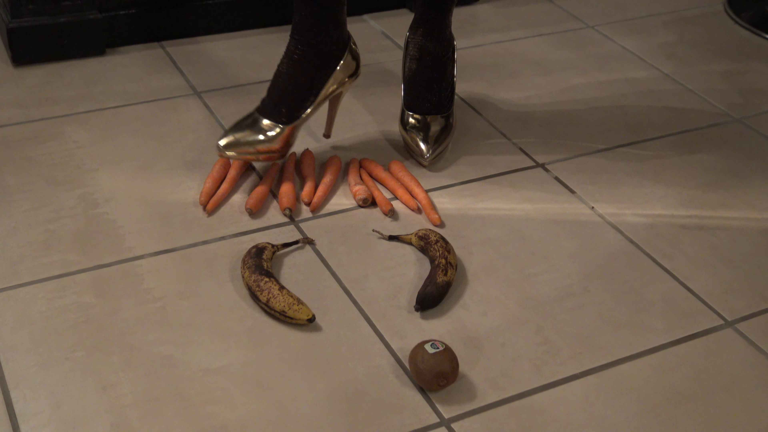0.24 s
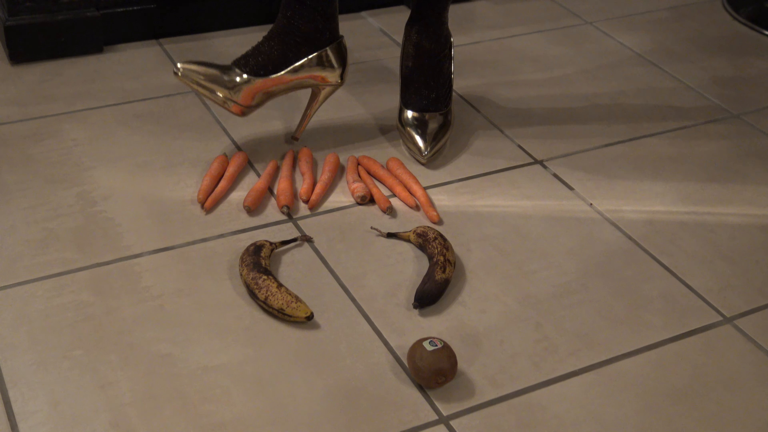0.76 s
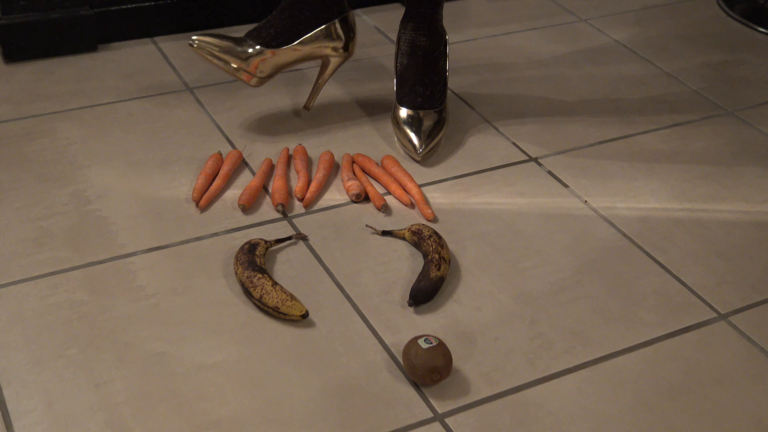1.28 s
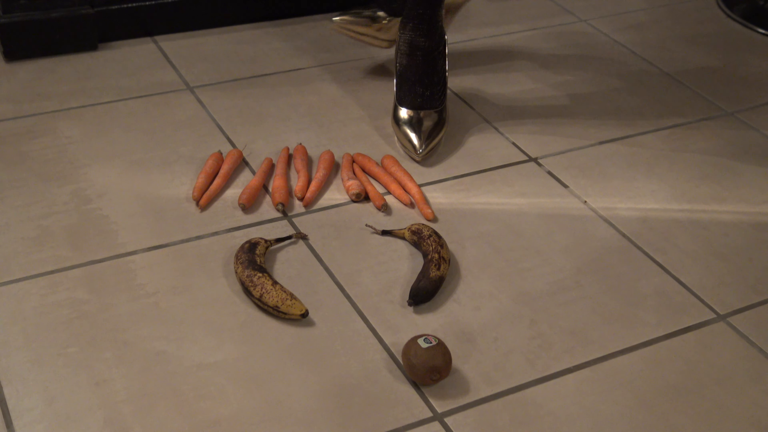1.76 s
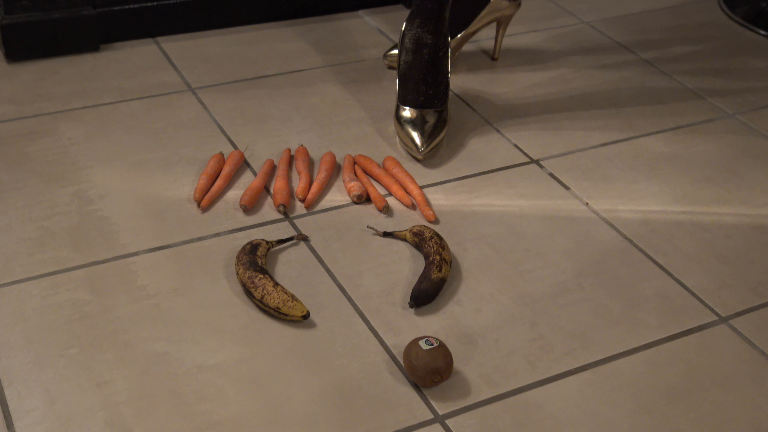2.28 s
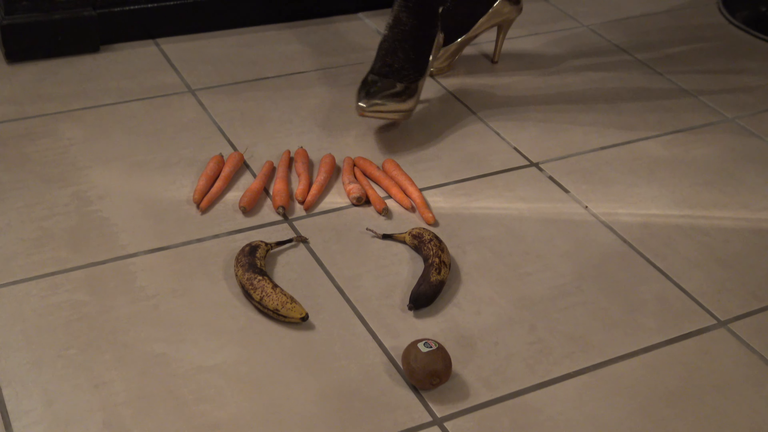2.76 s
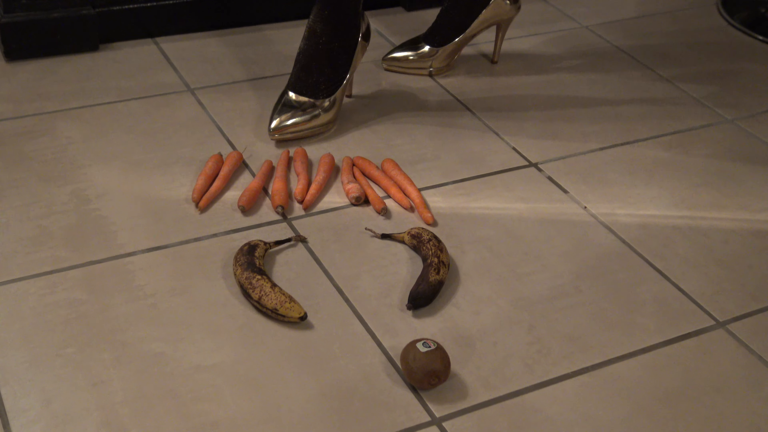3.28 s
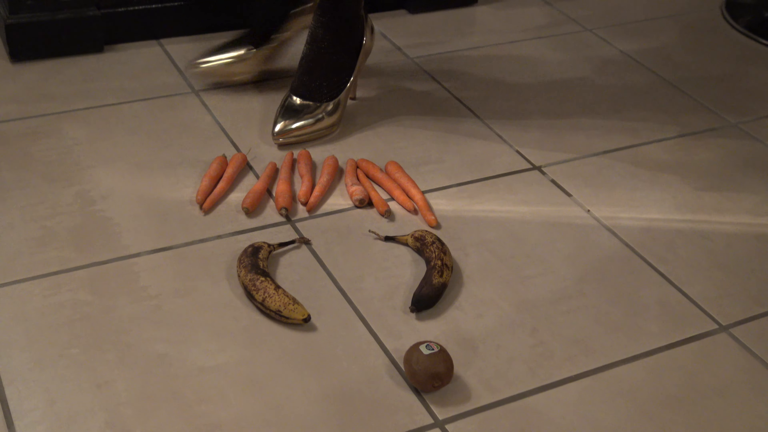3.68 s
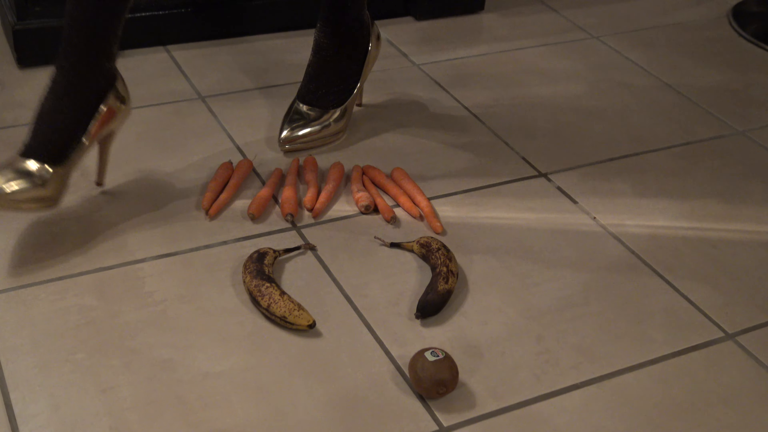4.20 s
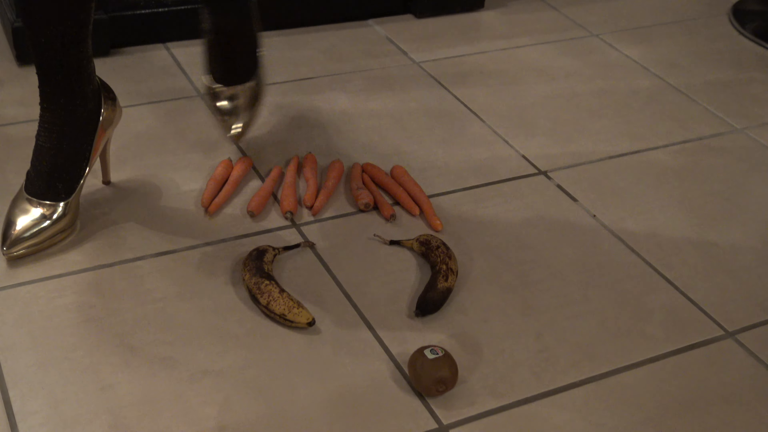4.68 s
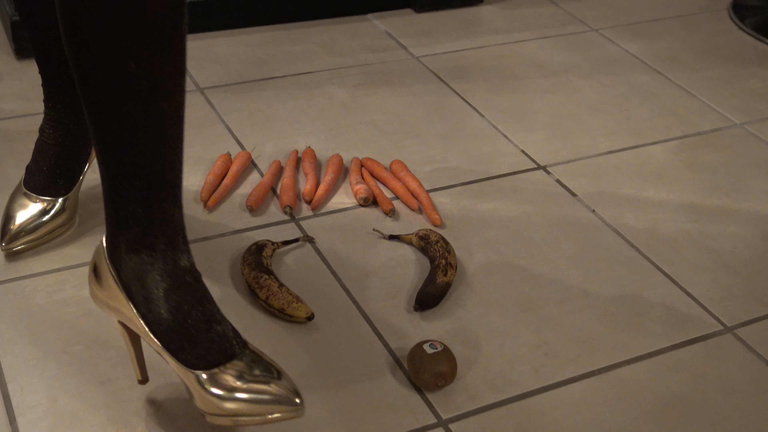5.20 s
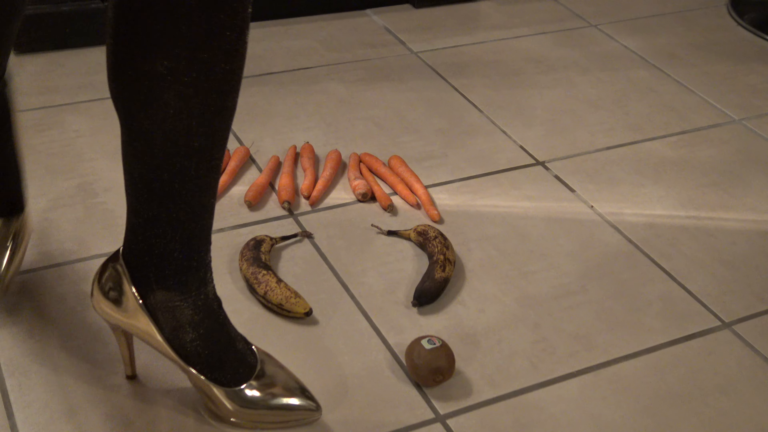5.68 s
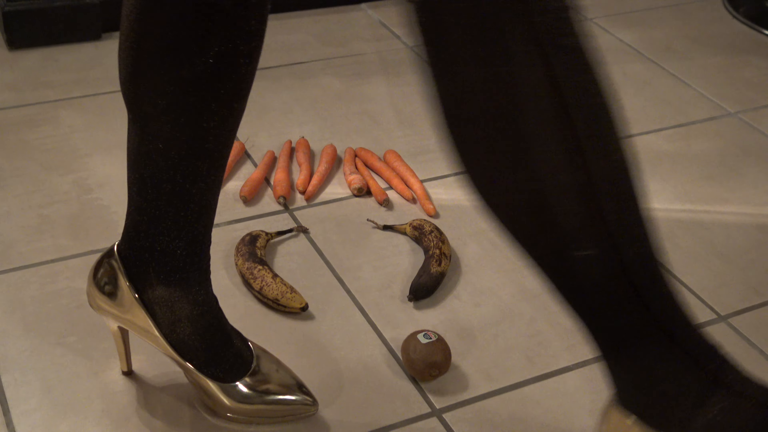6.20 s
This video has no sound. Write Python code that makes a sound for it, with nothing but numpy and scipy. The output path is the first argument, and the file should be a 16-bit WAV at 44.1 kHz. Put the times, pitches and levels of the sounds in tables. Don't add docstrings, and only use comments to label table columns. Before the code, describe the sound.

High heels step slowly across hard kitchen tile, five sharp knocks about a second apart, with stocking hiss and a faint refrigerator hum.

```python
import sys
import numpy as np
from scipy import signal
from scipy.fft import rfft, irfft, next_fast_len
from scipy.io import wavfile
from scipy.ndimage import map_coordinates

SR = 44100
rng = np.random.default_rng(int(sys.argv[2]) if len(sys.argv) > 2 else 0)


def attenuation_scalar(level_db):
    decades = np.asarray(level_db, float) / 20
    return 10 ** decades


def file_out(sig):
    cols = np.atleast_2d(sig).T
    lim = np.clip(cols, -1, 1)
    pcm = np.round(lim * 32767).astype(np.int16)
    wavfile.write(sys.argv[1], SR, pcm)


N = 284445
SPAN = 1 << 15
LEFT_RIGHT = np.array([[1], [-1]])


def unit(x):
    return x / np.sqrt(np.mean(x ** 2) + 1e-20)


def along(points, hz):
    f, v = np.transpose(points)
    return np.interp(np.log(hz + 1), np.log(f + 1), v)


def wobble(rate):
    knots = rng.standard_normal(int(N * rate / SR) + 4)
    return map_coordinates(knots, [np.arange(N) * rate / SR])


def spread(pair, gain, alike):
    hz = np.fft.rfftfreq(pair.shape[1], 1 / SR)
    turn = np.arccos(np.clip(along(alike, hz), -1, 1)) / 2
    mid, side = irfft(rfft(pair) * gain(hz) * [np.cos(turn), np.sin(turn)], pair.shape[1])
    return np.array([mid + side, mid - side])


def rush(gain, alike):
    noise = rng.standard_normal((2, next_fast_len(N)))
    return unit(spread(noise, gain, alike)[:, :N])


def resonance(hz, centre, sharp):
    swing = 1j * hz * centre / sharp
    return swing / (centre ** 2 - hz ** 2 + swing)


def swells(rows, rest_db):
    t = np.arange(N) / SR
    power = attenuation_scalar(2 * rest_db)
    for s, db, rise, fall in rows:
        width = np.where(t < s, rise, fall)
        power = power + attenuation_scalar(2 * (db - 6 * ((t - s) / width) ** 2))
    return np.sqrt(power)


# frequency in Hz, level in dB per Hz.
AIR_COLOUR = [(12, -50), (25, -19), (48, -15.5), (80, -15), (125, -11.5), (170, -9.5), (320, -9.5),
              (434, -15.5), (680, -14), (1050, -16.5), (1440, -25), (2820, -30.5), (12800, -36),
              (15800, -42)]
# frequency in Hz, left-right likeness from 0 to 1.
AIR_LIKENESS = [(25, 0.91), (60, 0.71), (130, 0.94), (290, 0.95), (640, 0.92), (1410, 0.89), (3100, 0.93),
                (6820, 0.64), (15000, .8)]
# frequency in Hz, left over right in dB.
AIR_BALANCE = [(60, -0.5), (110, -0.5), (200, 1.0), (380, 3.0), (700, 3.5), (1290, -1.0), (2380, 1.0),
               (4400, 0.0), (8120, 0.0), (15000, -0.5)]
# frequency in Hz, width in Hz, level in dB over the air.
CASE_WHIRR = [(172, 14, 6), (200, 8, 6), (258, 10, 5), (301, 10, 7), (348, 10, 7), (685, 20, 5),
              (990, 40, 6), (2799, 9, 15)]


def kitchen():
    def colour(hz):
        whirr = 1
        for centre, width, db in CASE_WHIRR:
            whirr = whirr + (attenuation_scalar(db) - 1) / (1 + (2 * (hz - centre) / width) ** 2)
        return attenuation_scalar(along(AIR_COLOUR, hz)) * whirr

    air = rush(colour, AIR_LIKENESS)
    lean = attenuation_scalar(along(AIR_BALANCE, np.fft.rfftfreq(N, 1 / SR)) / 2 * LEFT_RIGHT)
    air = irfft(rfft(air) * lean, N)
    hum_hz, hum_db, air_db = 99.4, -54.5, -53
    hum = np.sqrt(2) * np.sin(2 * np.pi * hum_hz * np.arange(N) / SR + 0.12 * wobble(5.7))
    hum = attenuation_scalar(hum_db + 0.6 * wobble(5)) * hum
    return attenuation_scalar(air_db + 1.23 * wobble(2.49)) * air + hum


# frequency in Hz, time to die by 60 dB in seconds.
WALL_DECAY = [(100, 0.28), (250, 0.34), (600, 0.33), (1500, 0.28), (4000, 0.27), (12000, 0.32)]
# frequency in Hz, level in dB.
WALL_TONE = [(100, 2.5), (250, 0), (600, -2), (1500, 7), (4000, 4), (12000, 3)]
# frequency in Hz, left-right likeness from 0 to 1.
WALL_LIKENESS = [(200, 1), (1500, 0.98), (3000, 0.99), (7000, 0.93), (15000, .93)]


def walls(gap=.001, ceiling=.008, before_db=-5, lumps_db=1.6):
    half = SPAN // 2
    hz, t, z = signal.stft(rng.standard_normal((2, half)), SR, nperseg=256)
    fade = attenuation_scalar(-60 * t / along(WALL_DECAY, hz)[:, None])
    tail = signal.istft(z * fade, SR, nperseg=256)[1][:, :half]
    tail = np.pad(tail, ((0, 0), (0, half)))
    tail = spread(tail, lambda f: attenuation_scalar(along(WALL_TONE, f)), WALL_LIKENESS)
    age = np.arange(SPAN) / SR
    echoes = map_coordinates(rng.standard_normal(200), [age * 220])
    onset = np.where(age < ceiling, attenuation_scalar(before_db), 1) * (age > gap) * attenuation_scalar(lumps_db * echoes)
    onset[half:] = 0
    return tail * onset / np.linalg.norm(tail[0] * onset)


def peak(spectrum):
    return spectrum / np.abs(irfft(spectrum)).max()


# time in seconds, left over right in dB.
WALKER_PLACE = [(0, 1.5), (2.1, 2), (3.2, 2.5), (4.3, 2.5), (5.3, 3), (6.3, 2), (6.45, -0.5)]


def contacts(rows, tip, sharp, bass, skid, room_db):
    out, hz = np.zeros((2, N + SPAN)), np.fft.rfftfreq(SPAN, 1 / SR)
    tick = 0
    for k, (mode_hz, mode_sharp, db) in enumerate(tip):
        tick = tick + (-1) ** k * attenuation_scalar(db) * resonance(hz, mode_hz, mode_sharp)
    tick = peak(tick)
    late = np.exp(-2j * np.pi * hz * 0.00063)
    place_s, place_db = np.transpose(WALKER_PLACE)
    for s, db, knock_hz, tick_db, wet_db in rows:
        soft = resonance(hz, knock_hz, sharp) * resonance(hz, knock_hz, 0.35) / (1j * hz + 1) ** 2
        small = (resonance(hz, bass * knock_hz, 0.91) * 1j * hz) ** 2
        lean = attenuation_scalar(np.interp(s, place_s, place_db) / 2 * LEFT_RIGHT)
        knock = -lean * peak(soft * small) * late
        slips = rng.standard_normal(SPAN) * attenuation_scalar(-60 * np.arange(SPAN) / SR / skid)
        slips = slips / np.linalg.norm(slips)
        direct = knock + attenuation_scalar(tick_db) * tick * rfft(slips)
        answer = (knock + attenuation_scalar(tick_db) * tick) * attenuation_scalar(room_db + wet_db) * rfft(walls())
        at = round(s * SR)
        out[:, at:at + SPAN] += attenuation_scalar(db) * irfft(direct + answer)
    return out[:, :N]


# start in seconds, knock peak in dB, knock pitch in Hz, tick in dB over the knock,
# room answer in dB.
SCUFF_HITS = [(.559, -50, 910, 1.5, 9), (.59, -56.5, 1500, 9, 4), (1.378, -56, 1500, 13, 5),
              (2.068, -28, 720, -16, 9.5), (2.3745, -40.5, 730, 7, -0.5), (2.378, -40.5, 2400, 10.5, -11),
              (2.381, -36.5, 654, -1, -8), (2.4192, -39.5, 790, 17, -9), (2.422, -36, 2420, -3, -11),
              (2.427, -37, 780, -3, -0.5), (2.45, -44, 780, -10, 6.5), (2.49, -41.5, 475, 0, 2.5),
              (2.56, -51.5, 920, 0.5, 10.5), (3.393, -33.5, 2600, -6, -10), (3.93, -47.5, 1200, 7, 1),
              (4.262, -42, 497, -7, 17), (5.319, -37.5, 607, -29, 22.5), (6.382, -33, 644, -6, 3)]
# frequency in Hz, sharpness (Q), level in dB.
LIGHT_TIP = [(1500, 1.1, -1.5), (2600, 1.62, 6), (4870, 0.94, 0.5), (9600, 0.97, -5.5)]


def scuffs():
    return contacts(SCUFF_HITS, LIGHT_TIP, sharp=2.2, bass=.58, skid=.0004, room_db=6)


# frequency in Hz, level in dB per Hz.
FIBRE_COLOUR = [(760, -36), (1300, -6.5), (2150, -2), (2710, -2), (4580, 0), (6090, 1), (8260, 2.5),
                (13500, -3.5), (16000, -7.5)]
# peak time in seconds, peak in dB, rise in seconds, fall in seconds,
# dullness in dB.
LEG_BRUSHES = [(.63, -67.5, 0.024, .05, 7), (.72, -65, .02, 0.025, 4), (.92, -64.5, 0.14, 0.16, 3),
               (1.79, -65.5, 0.067, 0.048, -14), (2.10, -47, 0.029, 0.07, 1), (2.2, -60, 0.046, 0.092, 8),
               (2.44, -55, 0.096, 0.11, -2), (2.68, -65.5, .08, .08, 4), (2.84, -52, 0.066, 0.081, 0),
               (3.02, -54, 0.11, 0.068, 0.5), (3.30, -61, .03, 0.052, 3), (3.49, -46.5, 0.068, 0.092, 2.5),
               (3.73, -57.5, 0.17, .07, 3), (4.05, -55.5, 0.11, 0.11, -1.5),
               (4.44, -51.5, 0.041, 0.055, -2), (4.66, -55, 0.16, 0.14, 3.5),
               (4.87, -56.5, 0.057, 0.092, -0.5), (5.02, -64, .06, 0.068, 5.5),
               (5.19, -62.5, 0.12, 0.24, 0), (5.42, -60, 0.1, 0.11, 7.5), (5.6, -53, 0.086, 0.079, 4),
               (5.73, -44, 0.076, 0.053, -1.5), (5.92, -55, 0.11, 0.077, 1.5),
               (6.15, -52.5, 0.074, 0.13, 2.5)]


def stockings():
    rest_db = -74.5
    bright = swells([row[:4] for row in LEG_BRUSHES], rest_db)
    dull = swells([(s, db + dull_db, rise, fall) for s, db, rise, fall, dull_db in LEG_BRUSHES], rest_db)

    def upper(hz):
        return 1 / (1 + (5200 / (hz + 1)) ** 6)

    def low_colour(hz):
        return attenuation_scalar(along(FIBRE_COLOUR, hz)) * np.sqrt(1 - upper(hz))

    def high_colour(hz):
        return attenuation_scalar(along(FIBRE_COLOUR, hz)) * np.sqrt(upper(hz))

    low = rush(low_colour, [(3000, 0.99), (7000, 1.0)])
    high = rush(high_colour, [(7000, 0.9), (15000, 0.98)])
    flutter = attenuation_scalar(0.19 * wobble(32) + 0.87 * wobble(110))
    hiss = flutter * (attenuation_scalar(-5.5) * dull * low + attenuation_scalar(1.0) * bright * high)
    return hiss * attenuation_scalar(0.2 * LEFT_RIGHT)


# start in seconds, knock peak in dB, knock pitch in Hz,
# tick in dB over the knock, room answer in dB.
SOLE_LANDING = [
    (2.0725, -4, 745, -13, -2.5),
    (2.0765, -9, 570, -11, -2),
]
# start in seconds, knock peak in dB, knock pitch in Hz,
# tick in dB over the knock, room answer in dB.
WEIGHT_ROLL = [
    (2.089, -10, 580, -16, -7.5),
    (2.099, -9, 483, -18, -6.5),
]
# frequency in Hz, sharpness (Q), level in dB.
SOLE_RING = [(1520, 1.2, 4), (2660, 1.7, 7), (5230, 0.73, -3.5), (9800, 0.87, -22)]


def stamp():
    landing = contacts(SOLE_LANDING, SOLE_RING, sharp=4.6, bass=0.4, skid=0.021, room_db=5.0)
    return landing + contacts(WEIGHT_ROLL, SOLE_RING, sharp=2.0, bass=0.31, skid=0.022, room_db=5.0)


# start in seconds, peak in dB, pitch in Hz, cycles to the peak.
WEIGHT_SHIFTS = [
    (2.08, -54, 45, 1.3),
    (2.485, -47, 162, 1.1),
    (3.29, -53.5, 40, 0.81),
    (3.438, -41.5, 117, 0.94),
    (4.3, -53, 62, 2.5),
    (4.459, -40.5, 110, 1.15),
    (5.6, -46, 105, 0.66),
    (2.553, -46, 896, 13.5),
]


def floor():
    out, t = np.zeros(N + SR), np.arange(SR // 2) / SR
    for s, db, hz, cycles in WEIGHT_SHIFTS:
        age = t * hz / cycles
        swell = age * np.exp(1 - age)
        out[round(s * SR):][:len(t)] += attenuation_scalar(db) * swell * np.sin(2 * np.pi * hz * t)
    return out[:N]


# peak time in seconds, peak in dB, rise in seconds, fall in seconds.
CLOTH_SWAYS = [
    (2.65, -69, .3, .5),
    (3.9, -56, 0.25, 0.2),
    (4.8, -53.5, 0.19, 0.13),
    (5.8, -57.5, 0.38, 0.13),
]
# peak time in seconds, peak in dB, rise in seconds, fall in seconds.
LINING_SLIDE = [
    (5.05, -69, .45, .14),
]


def clothes():
    heavy = rush(lambda hz: np.abs(resonance(hz, 348, 1.0)) ** 2, [(400, 0.91)])
    lining = rush(lambda hz: np.abs(resonance(hz, 5100, 7)) ** 2, [(5000, .97)])
    heavy = swells(CLOTH_SWAYS, rest_db=-67.5) * attenuation_scalar(0.89 * wobble(6)) * heavy
    return heavy + swells(LINING_SLIDE, rest_db=-81) * attenuation_scalar(1.8 * wobble(8)) * lining


# start in seconds, knock peak in dB, knock pitch in Hz, tick in dB over the knock,
# room answer in dB.
NEAR_BLOWS = [
    (3.1597, -11, 690, -12.5, -4.5),
    (3.1645, -17.5, 715, -14.5, -3.5),
    (3.174, -23, 370, -32, -4),
    (5.3255, -9, 564, -14.5, -3),
]
# frequency in Hz, sharpness (Q), level in dB.
NEAR_TIP = [(1160, 3.5, 6), (1490, 3, 3), (2070, 12.5, 4.5), (3010, 2.3, -4), (4630, 3.7, -2.5),
            (6550, 1.8, -11), (10800, 1.9, -15)]


def near_heel():
    return contacts(NEAR_BLOWS, NEAR_TIP, sharp=1.8, bass=0.33, skid=0.018, room_db=5.0)


# start in seconds, knock peak in dB, knock pitch in Hz,
# tick in dB over the knock, room answer in dB.
SOLE_SLAPS = [
    (3.2715, -25, 592, -3, -4),
    (3.277, -27.5, 605, -5, -4),
    (3.296, -28, 837, -8, -8),
    (3.302, -38, 625, -11.5, -1),
]
# frequency in Hz, sharpness (Q), level in dB.
PAD_RING = [(1085, 4, 6), (1820, 2.5, -2), (2740, 5.6, -4), (8000, .8, -38)]


def sole_slaps():
    return contacts(SOLE_SLAPS, PAD_RING, sharp=11.6, bass=0.32, skid=0.024, room_db=5.5)


# start in seconds, knock peak in dB, knock pitch in Hz,
# tick in dB over the knock, room answer in dB.
FAR_BLOWS = [
    (4.272, -11.5, 602, -4, -3),
    (4.2762, -18, 490, -32, 4.5),
    (4.2815, -10, 1120, -26, -9),
    (6.3905, -6.5, 564, -7, -4),
]
# frequency in Hz, sharpness (Q), level in dB.
FAR_TIP = [(1200, 12.6, 4), (1780, 11, 2), (2060, 5.6, 1.5), (2980, 2.74, -5), (4570, 3.4, -10.5),
           (7000, 3.5, -17), (10900, 2.5, -24.5)]


def far_heel():
    return contacts(FAR_BLOWS, FAR_TIP, sharp=1.0, bass=0.44, skid=0.00073, room_db=4)


# start in seconds, knock peak in dB, knock pitch in Hz,
# tick in dB over the knock, room answer in dB.
BALL_BOUNCES = [
    (4.3815, -20, 860, -8.5, -3),
    (4.405, -24, 890, -11, -1),
    (4.414, -27.5, 990, -8.5, -15),
    (5.385, -27, 550, -7.5, -0.5),
    (6.2935, -32, 560, -23, -2.5),
    (6.312, -37.5, 497, -20, -3),
]


def ball_of_foot():
    return contacts(BALL_BOUNCES, PAD_RING, sharp=2.4, bass=0.28, skid=.004, room_db=6)


def scene():
    steps = scuffs() + stamp() + near_heel() + sole_slaps() + far_heel() + ball_of_foot()
    return kitchen() + steps + stockings() + floor() + clothes()


def top_cut(x):
    return signal.sosfilt(signal.butter(12, 16510, fs=SR, output="sos"), x)


def record(dry):
    m = next_fast_len(N)
    kept = np.fft.rfftfreq(m, 1 / SR) < 15870
    mix = irfft(rfft(dry, m) * kept, m)[:, :N]
    return top_cut(mix)


dry = scene()
out = record(dry)
file_out(out)
```